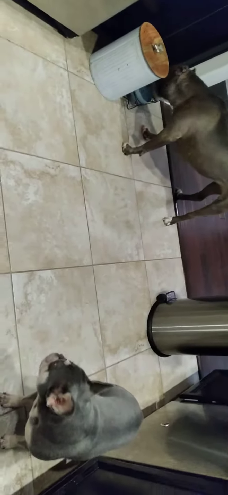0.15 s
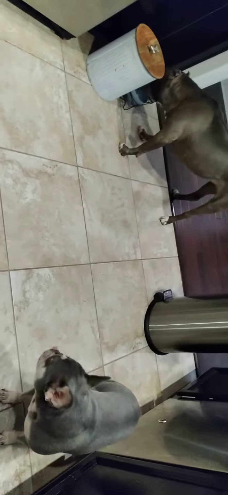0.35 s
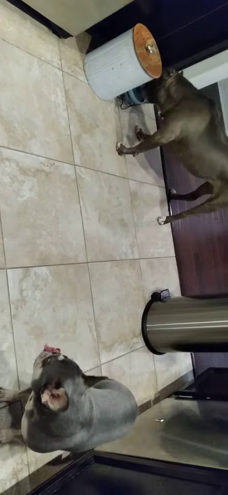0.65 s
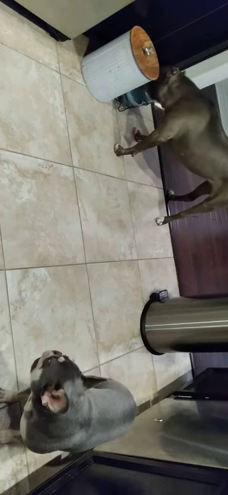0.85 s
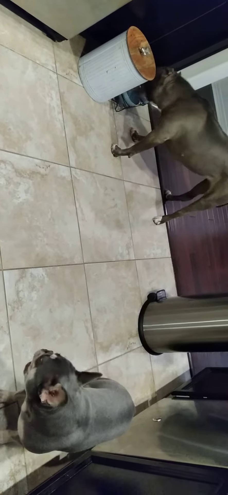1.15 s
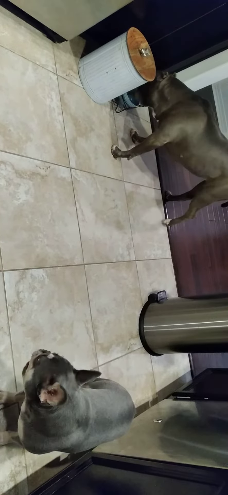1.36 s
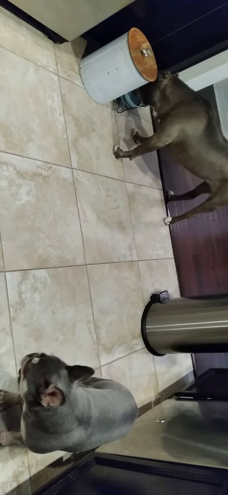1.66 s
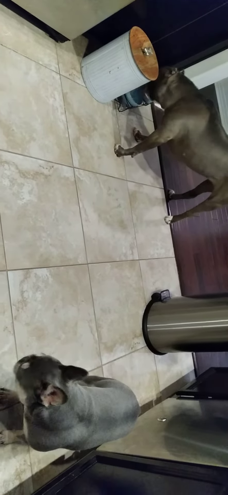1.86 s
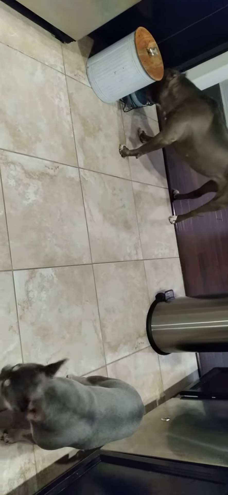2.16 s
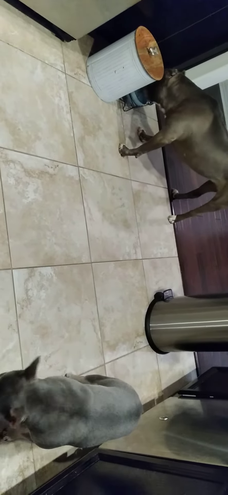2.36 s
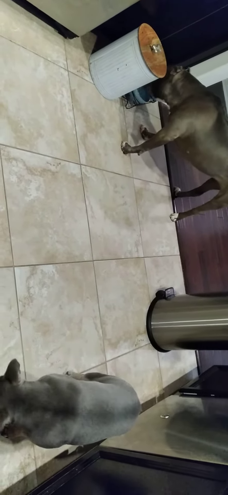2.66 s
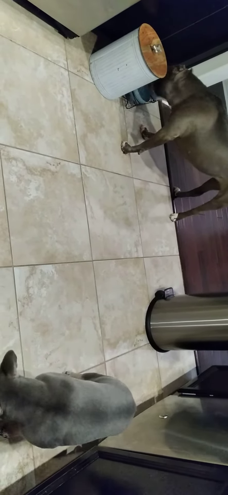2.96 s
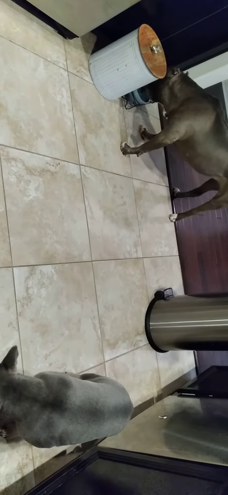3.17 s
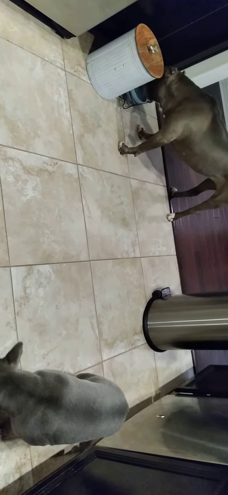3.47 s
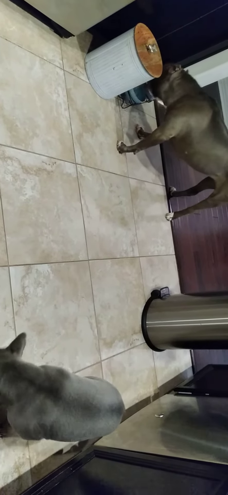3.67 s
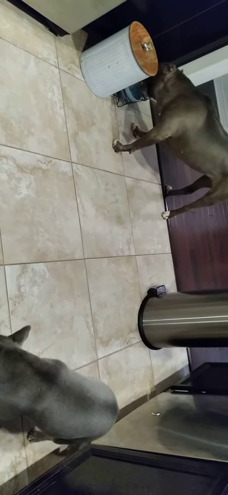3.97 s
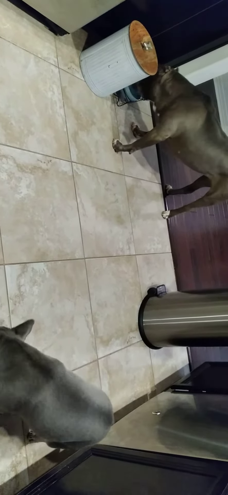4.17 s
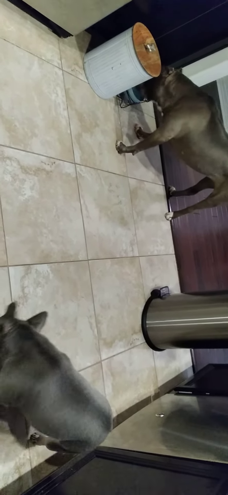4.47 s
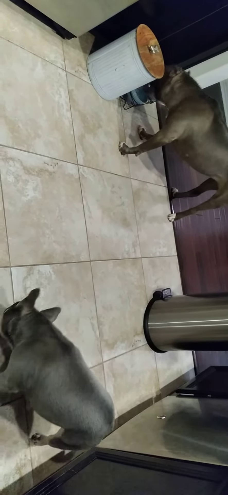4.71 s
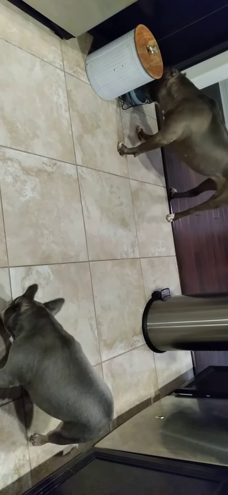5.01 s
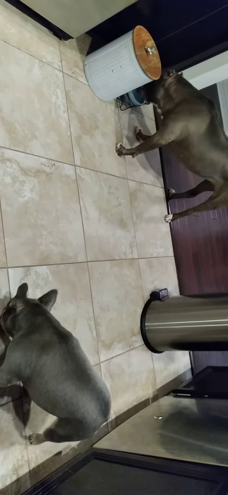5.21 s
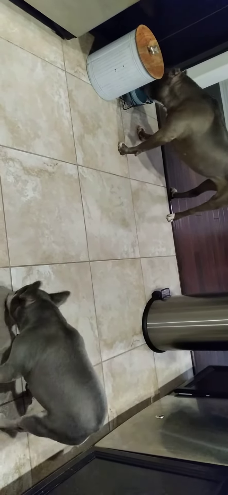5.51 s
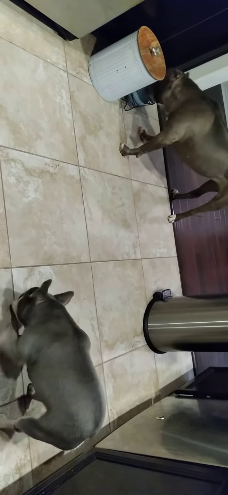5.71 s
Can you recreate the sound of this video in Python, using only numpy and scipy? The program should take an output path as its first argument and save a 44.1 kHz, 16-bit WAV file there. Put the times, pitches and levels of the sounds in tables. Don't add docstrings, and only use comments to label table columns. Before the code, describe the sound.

A dog laps water in a quick steady rhythm, each lap a wet smack, plop and crisp splash in a tiled kitchen.

```python
import sys
import numpy as np
from scipy import signal
from scipy.io import wavfile
from scipy.ndimage import uniform_filter1d

SR = 44100
rng = np.random.default_rng(int(sys.argv[2]) if len(sys.argv) > 2 else 0)


def ratio_of_db(decibels):
    return 10 ** (np.asarray(decibels, float) / 20)


def digitize_waveform(pressure):
    field = np.atleast_2d(pressure).T
    bounded = np.clip(field, -1, 1)
    quanta = np.round(bounded * 32767).astype(np.int16)
    wavfile.write(sys.argv[1], SR, quanta)


N = 257984

# f/Hz, correlation [0..1]
PORT_LIKENESS = [(60, 0.0029), (130, 1), (290, 0.68), (640, 0.36), (1400, 0.042)]
# f/Hz, level/dB
SPRAY_SPECTRUM = [(2350, -54.5), (4000, -20), (4890, -13), (5480, -9.5), (6500, -8.5), (8340, -1),
                  (9390, 4.5), (10700, -9), (11800, -4.5), (14000, -18), (15600, -21), (16200, -63),
                  (16500, -76)]
# f/Hz, level/dB
MIST_SPECTRUM = [(9000, -51), (11500, 23), (13500, 28), (15500, 24), (16500, -32)]
GATE_DB = 17


def evened(x):
    return x / np.sqrt(np.mean(x ** 2) + 1e-20)


def read(points, hz):
    f, value = np.transpose(points)
    return np.interp(np.log(hz + 1), np.log(f + 1), value)


def add(mix, s, sound):
    part = mix[..., round(s * SR):][..., :sound.shape[-1]]
    part += sound[..., :part.shape[-1]]


def sides(pan_db):
    return ratio_of_db(np.array([[pan_db / 2], [-pan_db / 2]]))


def colour(x, points):
    level_db = read(points, abs(np.fft.fftfreq(4096, 1 / SR)))
    log_gain = np.log(ratio_of_db(np.maximum(level_db, -100)))
    taps = np.fft.ifft(np.exp(np.conj(signal.hilbert(log_gain)))).real[:1024]
    return signal.oaconvolve(x, taps[None] / np.linalg.norm(taps), axes=1)[:, :N]


def resonate(x, hz, width):
    turn = np.exp(2j * np.pi * np.cumsum(hz * np.ones(x.shape[-1])) / SR)
    r = np.exp(-np.pi * width / SR)
    return 2 * (turn * signal.lfilter([1 - r], [1, -r], x / turn)).real


def patches(shape, bins, frames):
    field = rng.standard_normal(shape[::-1]).T
    field = uniform_filter1d(field, size=bins, axis=0)
    return evened(uniform_filter1d(field, size=frames, axis=1))


def floor():
    # f/Hz, level/dB
    air_spectrum = [(12, -42), (20, -14), (65, -10.5), (218, -3), (506, -23), (616, -12.5), (816, -24),
                    (1110, -11.5), (1240, -21), (3420, -25.5), (6170, -25), (9140, -17), (11800, -30.5),
                    (15200, -30), (16500, -40)]
    # f/Hz, level/dB, width/Hz
    hum_tones = [(51.3, -101, 13), (73.4, -89.5, 12.7), (220.6, -101, 8.8)]
    frames, hz = N // 256 + 5, np.fft.rfftfreq(1024, 1 / SR)
    a, b, c, d = rng.standard_normal((frames, 513, 4)).T
    same = np.clip(read(PORT_LIKENESS, hz), -1, 1)[:, None]
    left, other = a + 1j * b, c + 1j * d
    z = np.array([left, same * left + np.sqrt(1 - same ** 2) * other])
    z *= ratio_of_db(read(air_spectrum, hz)[:, None] + 1.8 * patches(a.shape, bins=12, frames=14))
    air = ratio_of_db(-89.5 + 6) * evened(signal.istft(z, nperseg=1024, noverlap=768)[1][:, :N])
    hum = sum(ratio_of_db(db) * evened(resonate(rng.standard_normal(N), f, width)) for f, db, width in hum_tones)
    return air + hum


def bubble(hz, cycles, glide, rise):
    u = np.arange(0, 3, hz / max(cycles, 1) / SR)
    shape = np.minimum(u / rise, 1) ** 2 * np.exp(-3.0 * np.maximum(u - rise, 0))
    return shape * np.sin(2 * np.pi * cycles * (u + glide * u ** 2 / 2))


def droplets(drive, low_hz, high_hz, per_s):
    landed = rng.random(N) < per_s / SR
    sizes = drive * ratio_of_db(3.26 * np.minimum(rng.exponential(1, N), 2.8)) * landed
    kind, pitches = rng.integers(0, 24, N), np.geomspace(low_hz, high_hz, 24)
    out = np.zeros(N)
    for k, hz in enumerate(pitches):
        ring = bubble(hz, 4.67, glide=0.055, rise=0.32)
        out += signal.oaconvolve(sizes * (kind == k), ring)[:N]
    return out[None]


def sprays():
    # t/s, peak level/dB, t60/s
    lip_dribbles = [(0.014, -47, 0.039), (.151, -56, 0.25), (0.717, -57, 0.12), (0.794, -44.5, 0.095),
                    (0.84, -47, 0.04), (1.274, -40, 0.98), (1.802, -43.5, 0.059), (1.8477, -62, .12),
                    (2.071, -53.5, 0.074), (2.21, -44.5, 0.029), (2.2545, -39.5, 0.041),
                    (2.615, -43.5, 0.08), (2.922, -57.5, 0.47), (3.207, -56.5, 0.11), (3.281, -45, 0.045),
                    (3.566, -52, 0.015), (3.6237, -59.5, 0.51), (3.6926, -44, 0.75), (5.039, -40.5, 0.027),
                    (5.3762, -58, 0.29), (5.4636, -45.5, 0.22)]
    # t/s, peak level/dB, body/dB relative, t60/s
    tongue_splashes = [(0.146, -37, -20, 0.11), (0.333, -42.5, -16, 0.031), (0.484, -28.5, -30, 0.1),
                       (0.8916, -19.5, -13, 0.028), (1.058, -42, -7.5, 0.026), (1.233, -28.5, -27.5, 0.062),
                       (1.42, -52, -27, 1), (1.569, -29.5, -25.5, 0.077), (1.766, -39, -15, 0.027),
                       (1.898, -34, -16.5, 0.26), (2.3045, -20, -18, 0.043), (2.4723, -51.5, -17, 0.11),
                       (2.6379, -16, -15.5, 0.019), (2.772, -31.5, -10, 0.087), (2.979, -21, -20, 0.063),
                       (3.384, -17.5, -19, 0.023), (3.5456, -54, -13.5, 0.5), (3.733, -34, -17, 0.049),
                       (4.0725, -21.5, -19.5, 0.036), (4.2115, -26.5, -6.5, 0.02),
                       (4.414, -29, -21.5, 0.081), (4.5688, -20.5, -19.5, 0.041),
                       (4.805, -33, -33.5, 0.038), (4.939, -34, -2.5, 0.03), (5.138, -26, -26, 0.18),
                       (5.286, -52, -4, 0.032), (5.475, -35, -13.5, 0.041), (5.8134, -26, -19, 0.063)]
    # t/s, peak level/dB, body/dB relative
    tongue_flicks = [(0.2095, -24, -20), (0.504, -28.5, -16.5), (0.543, -25, -11.5), (0.563, -44, -29),
                     (.625, -41, -24), (0.886, -31.5, -27), (0.9408, -35.5, -13), (1.157, -41.5, -33),
                     (1.166, -40.5, -37), (1.275, -36.5, -24), (1.447, -37, -40), (1.559, -28.5, -25.5),
                     (1.613, -27, -26), (1.6582, -23.5, -26.5), (1.895, -32.5, -18), (1.9106, -46, -38),
                     (1.957, -33.5, -24), (2.31, -40, -38), (2.347, -25, -22), (2.678, -24.5, -23),
                     (2.969, -33, -16.5), (3.016, -30, -14.5), (3.3745, -36.5, -13), (3.4334, -49.5, 2),
                     (3.772, -24, -15.5), (3.971, -37.5, -26), (4.052, -25.5, -41), (4.119, -33, -44),
                     (4.265, -29.5, -39), (4.394, -29.5, -42), (4.4598, -24.5, -21.5), (4.481, -31.5, -26),
                     (4.58, -32.5, -16.5), (4.698, -37.5, -38), (4.7942, -28, -29), (4.8035, -38, -28),
                     (4.8464, -26, -12), (5.483, -21, -17.5), (5.526, -24.5, -43), (5.827, -29, -57)]
    # f/Hz, level/dB
    body_spectrum = [(500, 2.5), (1200, -3.5), (2000, 5.5), (3200, 12), (4500, 13.5), (6000, 10.5)]
    splash_mist_db, flick_mist_db, dribble_mist_db = -29, -27, -26
    flick_t60, dribble_body_db = 0.045, -27
    apart = 0.61

    bursts = [(*row, splash_mist_db) for row in tongue_splashes]
    bursts += [(*row, flick_t60, flick_mist_db) for row in tongue_flicks]
    bursts += [(s, db, dribble_body_db, t60, dribble_mist_db) for s, db, t60 in lip_dribbles]
    fine, body, top = np.zeros((3, N))
    t = np.arange(9000) / SR
    for s, db, body_db, t60, mist_db in bursts:
        burst = ratio_of_db(db - 18.0 - 60 * t / max(t60, .01)) * np.minimum(t / 0.0044, 1)
        add(fine, s - .003, burst)
        add(body, s - .003, ratio_of_db(body_db + 12.5) * burst)
        add(top, s - .003, ratio_of_db(mist_db + 10.5) * burst)

    fizz, mist, clumps = rng.standard_normal((3, 1, N))
    fizz = np.sqrt(1 - apart ** 2) * fizz + apart * rng.standard_normal((2, N))
    clumps = ratio_of_db(3.6 * np.clip(evened(uniform_filter1d(clumps, size=90)), -3, 2))
    bright = colour(fine * clumps * fizz, SPRAY_SPECTRUM)
    bright = bright + ratio_of_db(0.5) * colour(droplets(fine, 5240, 9930, per_s=1200), SPRAY_SPECTRUM)
    bubbly = colour(droplets(body, 1153, 6040, per_s=2200), body_spectrum)
    return sides(6.0) * (bright + bubbly + colour(top * clumps * mist, MIST_SPECTRUM))


def plops():
    # t/s, peak level/dB, f/Hz, slop/dB relative
    lap_pockets = [(.152, -52.5, 690, -11), (.482, -59, 1020, -3), (.511, -45.5, 900, -6.5),
                   (.889, -39, 830, -17.5), (1.238, -50, 497, -29), (1.396, -59, 940, -2.5),
                   (1.498, -71, 295, 3), (1.57, -47, 628, -7), (1.903, -39, 1010, -8.5),
                   (2.303, -37, 820, -14), (2.642, -40.5, 853, -33), (2.977, -47.5, 590, -4),
                   (3.378, -49, 950, 5), (3.732, -52.5, 552, -7), (4.074, -49.5, 983, -6.5),
                   (4.412, -44.5, 1024, -38), (4.805, -41.5, 818, -20), (5.144, -50.5, 1050, -7),
                   (5.475, -43, 827, -26), (5.83, -48.5, 523, 2)]
    # t/s, peak level/dB, f/Hz
    gulp_pockets = [(0.313, -58, 1100), (1.064, -55, 710), (1.36, -58, 845), (2.632, -46.5, 1150),
                    (2.774, -36.5, 1254), (3.383, -48.5, 740), (3.552, -59.5, 750), (3.899, -60.5, 817),
                    (4.212, -36.5, 1350), (4.565, -41, 1147), (4.787, -53.5, 1110), (4.942, -43.5, 1430),
                    (5.28, -56, 1066), (5.627, -48, 1385)]
    # f/Hz, level/dB
    slop_spectrum = [(90, -17.5), (170, 18.5), (260, 14), (450, -5.5), (700, -7.5), (1200, -66.5)]
    pockets = [(*row, 1) for row in lap_pockets] + [(*row, -78, 0.77) for row in gulp_pockets]
    out, slop, t = np.zeros((2, N)), np.zeros((1, N)), np.arange(4000) / SR
    for (s, db, hz, slop_db, ring), luck in zip(pockets, rng.random((len(pockets), 8, 2))):
        cycles = (4.68 + 0.0014 * hz) * ring
        add(out, s - .0025, ratio_of_db(db) * sides(hz / 160) * bubble(hz, cycles, glide=.05, rise=.3))
        for late, size in luck[3:]:
            leftover = bubble(hz * (0.925 + 0.038 * late + 0.21 * size), cycles, glide=0.024, rise=0.24)
            add(out, s + .13 * late, ratio_of_db(db - 21.5 - 14.5 * late) * sides(1.2) * leftover)
        for late, size in luck[:3]:
            neighbour = bubble(hz * (0.425 + 0.61 * size), 3.3, glide=0.85, rise=0.063)
            add(out, s + .028 * late, ratio_of_db(db + 0.8 * slop_db) * sides(hz / 250) * neighbour)
        surge = np.minimum(t / 0.01, 1) * ratio_of_db(-60 * t / 0.049) * rng.standard_normal(len(t))
        add(slop, s - .002, ratio_of_db(db + slop_db + 8.0) * surge[None])
    return out + colour(slop, slop_spectrum)


def drips():
    # t/s, peak level/dB, f/Hz
    hard_ticks = [
        (0.154, -33, 5100),
        (0.5465, -30.5, 4500),
        (1.894, -34.5, 5600),
        (2.776, -31.5, 2160),
        (3.556, -38.5, 4300),
        (3.8933, -40, 3560),
        (4.401, -35, 3880),
        (4.8043, -32, 2410),
        (4.8476, -31, 3330),
    ]
    # t/s, peak level/dB, f/Hz
    small_bubbles = [(0.199, -44.5, 2440), (0.432, -62, 1890), (0.4855, -42.5, 1940), (0.8395, -56.5, 4200),
                     (0.892, -47, 2720), (1.042, -53.5, 1860), (1.059, -36.5, 3100), (1.065, -46, 3310),
                     (1.072, -49, 4100), (1.169, -42, 5550), (2.468, -55, 3960), (4.219, -49, 5040),
                     (4.579, -41, 5170), (1.281, -44.5, 1854), (1.29, -64, 1780), (1.615, -45, 2690),
                     (1.9561, -39.5, 3030), (2.3016, -38, 3550), (2.462, -44, 3010), (2.7742, -37, 2840),
                     (2.779, -48, 3050), (3.016, -34.5, 4900), (3.384, -33, 4070), (3.7704, -48, 2000),
                     (4.0719, -45.5, 1830), (4.2124, -37.5, 2820), (4.2185, -39, 2010),
                     (4.572, -42.5, 1880), (4.805, -42, 2400), (4.8462, -33.5, 3210), (4.8485, -34.5, 4520),
                     (4.852, -49, 5100), (4.857, -43, 1950), (4.9401, -41, 2850), (4.9413, -42, 1940),
                     (5.1436, -43, 3270), (5.4824, -65, 4530), (5.624, -47, 2750)]
    # t/s, peak level/dB,
    # f/Hz, cycles
    partner_pockets = [(.156, -44, 1020, 3.3), (.372, -67, 1130, 11), (1.74, -62, 72, 2.5),
                       (3.63, -62, 58, 2.7), (4.87, -57, 62, 2.7), (2.87, -60.5, 1320, 34),
                       (0.896, -47, 180, 7.3), (1.229, -52.5, 1050, 5.5), (1.591, -49.5, 640, 4.6),
                       (1.265, -58, 480, 7.4), (1.72, -57, 1040, 3.7), (1.765, -67, 1220, 5.3),
                       (1.785, -72, 750, 6.6), (1.908, -42, 576, 2.4), (1.912, -52, 1020, 2.4),
                       (3.722, -52.5, 1060, 9), (3.877, -59, 1750, 12), (2.31, -38.5, 980, 4.4),
                       (2.984, -46.5, 183, 3.8), (2.979, -42.5, 1035, 5.1), (3.736, -48.5, 192, 2.7),
                       (4.078, -49.5, 477, 2.9), (4.418, -43.5, 540, 3.1), (5.15, -44.5, 582, 7),
                       (5.48, -49, 186, 3.3), (5.486, -49.5, 655, 7), (4.953, -48.5, 1490, 5.7),
                       (5.133, -45.5, 1067, 16.4), (5.818, -46, 1070, 9.9)]
    out = np.zeros((2, N))
    drops = [(*row, 10) for row in small_bubbles] + [(*row, 2.8) for row in hard_ticks]
    for s, db, hz, cycles in drops:
        add(out, s - .001, ratio_of_db(db - 6.0) * sides(7.8) * bubble(hz, cycles, glide=0.028, rise=0.24))
    for s, db, hz, cycles in partner_pockets:
        add(out, s, ratio_of_db(db) * bubble(hz, cycles, glide=0.057, rise=0.18)[None])
    return out


def smacks():
    # t/s, peak level/dB, sharp edge/dB relative
    lip_smacks = [(0.21, -34, -20), (.4855, -33, -22), (.505, -30, -20), (.545, -28, -22),
                  (0.625, -28, -24), (1.2405, -33, -20), (1.251, -32, -24), (1.275, -28, -26),
                  (1.4193, -20, -25), (1.433, -31, -26), (1.4485, -31, -28), (1.5716, -19.5, -27),
                  (1.659, -18, -15), (1.6718, -22.5, -20), (1.9131, -26, -16), (2.309, -19.5, -26),
                  (2.347, -20, -25), (2.425, -39, -14), (2.6432, -20, -19), (2.9811, -25, -17),
                  (3.019, -31, -21), (3.387, -22.5, -28), (3.4357, -27.5, -23), (3.729, -31, -24),
                  (3.735, -26, -24), (3.742, -24, -24), (3.7735, -23.5, -20), (4.0532, -23.5, -13),
                  (4.0728, -19, -23), (4.115, -19, -21), (4.2178, -35, -13), (4.266, -31, -19),
                  (4.4153, -20, -20), (4.458, -22, -18), (4.5658, -19.5, -20), (4.58, -22, -21),
                  (4.699, -38, -24), (4.795, -32, -17), (4.8053, -23.5, -15), (4.8473, -20.5, -11),
                  (5.2875, -35.5, -21), (5.4854, -19.5, -23), (5.833, -22, -23)]
    # f/Hz, level/dB
    snap_spectrum = [(3000, -53), (5500, -12.5), (7000, -9.5), (9000, 8), (12000, -8.5), (15500, -17.5)]
    fine, edge = np.zeros((2, 1, N))
    t = np.arange(300) / SR
    for (s, db, edge_db), noise in zip(lip_smacks, rng.standard_normal((len(lip_smacks), len(t)))):
        snap = ratio_of_db(db - 12) * np.minimum(t / 0.00068, 1) * np.exp(-t / 0.0022) * np.sign(noise)
        add(fine, s - .0006, snap[None])
        add(edge, s - .0006, ratio_of_db(edge_db + 11.0) * snap[None])
    return sides(8.4) * (colour(fine, snap_spectrum) + colour(edge, MIST_SPECTRUM))


def hisses():
    # t/s, level/dB, whistle centre f/Hz
    muzzle_hisses = [
        [(1.15, -105, 8700), (1.225, -85, 8500), (1.24, -47.5, 9000), (1.265, -54, 8900), (1.3, -56, 8700),
         (1.335, -47.5, 8700), (1.39, -57, 8350), (1.45, -51.5, 8500), (1.56, -59, 8400)],
        [(3.6, -72, 11200), (3.64, -63, 11200), (3.685, -61, 10800), (3.71, -51, 10600), (3.745, -46, 10400),
         (3.8, -49, 10200), (3.85, -49.5, 10200), (3.89, -50.5, 10200), (3.95, -80, 9900)],
        [(5.52, -62, 9250), (5.64, -68.5, 10300), (5.81, -74, 9200)],
        [(3.7, -73, 9300), (3.74, -53, 9100), (3.78, -47, 8750), (3.83, -49, 8550), (3.87, -52, 8400),
         (3.92, -72, 8400)],
    ]
    loose_lips_db = [4, -5, 3, -25]
    broad_rush_db = [-15, -1.5, 10, -10]
    whistle_widths = [1200, 700, 1200, 900]
    out = np.zeros((2, N))
    for rows, lips_db, rush_db, width in zip(muzzle_hisses, loose_lips_db, broad_rush_db, whistle_widths):
        s, *columns = np.transpose(rows)
        t = np.arange(s[0], s[-1], 1 / SR)
        db, hz = (np.interp(t, s, c) for c in columns)
        mist_db = -66 + 0.15 * (db + 50) - db
        flutter_db = -62.5 + 0.49 * (db + 50) - db
        air, wide, more, low, sputter = rng.standard_normal((5, 2, len(t)))
        whistle = evened(resonate(resonate(air, hz, width), hz, 2.3 * width))
        rush = evened(colour(wide, SPRAY_SPECTRUM)[:, :len(t)])
        mist = evened(colour(more, MIST_SPECTRUM)[:, :len(t)])
        flutter = evened(resonate(resonate(low[0], 200, 59), 140, 300))
        sputter = ratio_of_db(2.0 * evened(uniform_filter1d(sputter[0], size=150)))
        gust = sputter * (whistle + ratio_of_db(rush_db) * rush + ratio_of_db(mist_db) * mist)
        gust = gust + ratio_of_db(flutter_db + lips_db) * flutter
        add(out, s[0], ratio_of_db(db - 3.0) * sides(3.7) * gust * signal.windows.tukey(len(t), .15))
    return out


def dense_tail():
    # f/Hz, t60/s
    room_t60 = [(250, 0.17), (700, 0.39), (1700, 0.39), (4500, 0.36), (9000, 0.33), (14000, 0.16)]
    taps = np.zeros((2, SR // 2))
    at = np.arange(300, SR // 2 - 20, 20) + rng.integers(0, 20, (2, (SR // 2 - 301) // 20))
    np.put_along_axis(taps, at, rng.choice([-1., 1.], at.shape), 1)
    hz, t, z = signal.stft(taps, SR, nperseg=512)
    same = np.clip(read(PORT_LIKENESS, hz), -1, 1)[:, None]
    z[1] = same * z[0] + np.sqrt(1 - same ** 2) * z[1]
    fade = ratio_of_db(-60 * t / read(room_t60, hz)[:, None])
    tail = signal.istft(z * fade, SR, nperseg=512)[1][:, :SR // 2]
    tail = tail * np.minimum(np.arange(SR // 2) / SR / .02, 1)
    return tail / np.linalg.norm(tail[0])


def kitchen(x):
    # delay t/s, left level/dB, right level/dB
    wall_echoes = [(.0045, -14, -12), (.008, -10, -11), (.0128, -3, -6), (.017, -14, -12), (.022, -11, -13),
                   (.029, -12, -12)]
    echo_skews = [5, -14, 17, -6, 11, -20]
    corner_modes = [613, 662, 716, 820, 937, 1093, 1264, 1321, 1394, 1521]
    x, t = x.mean(0)[None], np.arange(SR // 2) / SR
    early = np.zeros((2, SR // 2))
    for (s, left_db, right_db), skew in zip(wall_echoes, echo_skews):
        early[[0, 1], [round(s * SR) + skew, round(s * SR)]] = ratio_of_db(np.array([left_db, right_db]))
    corner_fade = ratio_of_db(-44 - 60 * t / 0.2) * np.minimum(t / .003, 1)
    for f, phase in zip(corner_modes, rng.random((len(corner_modes), 2, 1))):
        early += corner_fade * np.sin(2 * np.pi * (f * t + phase))
    sway = np.pi * 3.1 * np.arange(N) / SR
    tails = sum(signal.oaconvolve(x * part(sway), dense_tail(), axes=1) for part in (np.sin, np.cos))
    return (signal.oaconvolve(x, early, axes=1) + ratio_of_db(-3) * tails)[:, :N]


def shaded(x, depth_db):
    hz, _, z = signal.stft(x, SR, nperseg=256)
    blotches = np.array([patches(z.shape[1:], bins=4, frames=14) for _ in x])
    shade_db = depth_db * np.clip(hz / 2000, 0, 1)[:, None] * blotches
    return signal.istft(z * ratio_of_db(shade_db), nperseg=256)[1][:, :N]


def scene():
    water, mouth = plops() + drips() + sprays(), smacks()
    direct = water + mouth + hisses()
    direct[0] = np.roll(direct[0], 17)
    heard = direct + sides(2.0) * kitchen(ratio_of_db(3.5) * water + ratio_of_db(-8.0) * mouth)
    return ratio_of_db(1.5) * shaded(heard, depth_db=3.0) + ratio_of_db(GATE_DB) * floor()


def top_cut(x):
    return signal.sosfilt(signal.butter(12, 16640, fs=SR, output="sos"), x)


def record(dry):
    z = signal.stft(dry, nperseg=512)[2]
    power = uniform_filter1d((abs(z) ** 2).mean(0), size=15, axis=0)
    power = uniform_filter1d(power, size=3, axis=1)
    power_db = 10 * np.log10(power + 1e-20)
    floor_db = np.percentile(power_db, 12, axis=1, keepdims=True)
    over_db = power_db - floor_db - 1.5
    over_db[:4] = -99
    gate_gain = ratio_of_db(-GATE_DB / (1.5 + np.exp(over_db / 2.03)))
    gated = signal.istft(z * gate_gain, nperseg=512)[1][:, :N]
    gated = signal.sosfilt(signal.butter(2, 40, "high", fs=SR, output="sos"), gated)
    band_limit = signal.firwin(511, 15900, window=("kaiser", 9), fs=SR)
    limited = signal.oaconvolve(gated, band_limit[None], "same")
    return top_cut(limited)


dry = scene()
out = record(dry)
digitize_waveform(out)
```